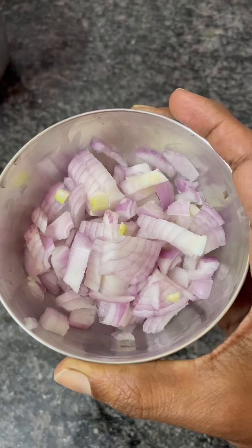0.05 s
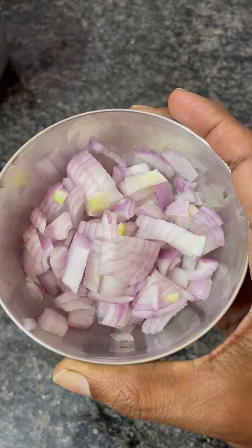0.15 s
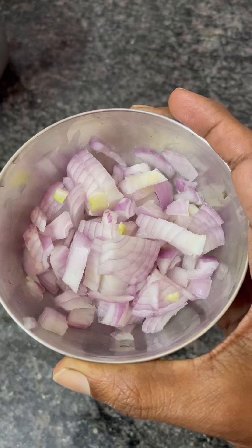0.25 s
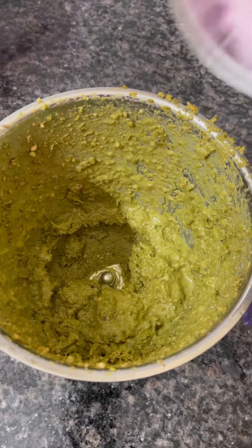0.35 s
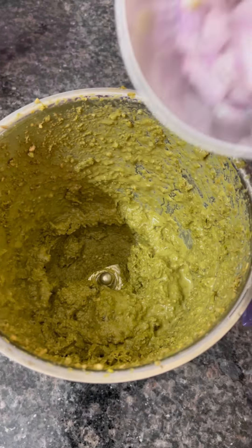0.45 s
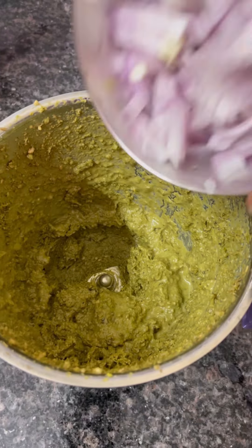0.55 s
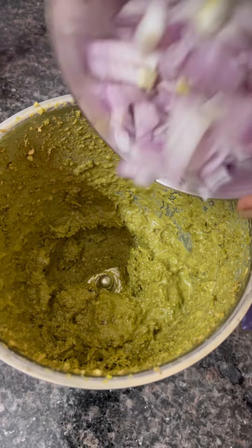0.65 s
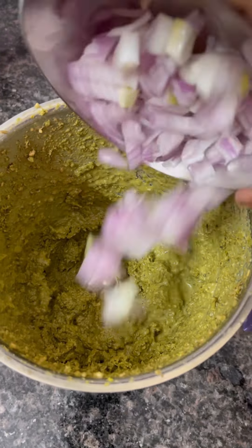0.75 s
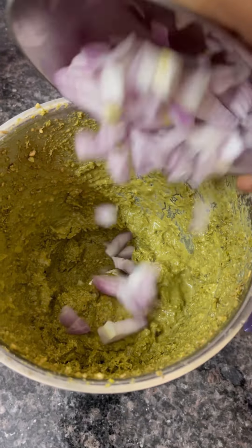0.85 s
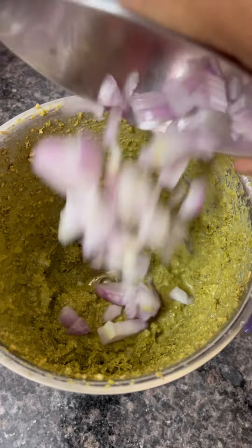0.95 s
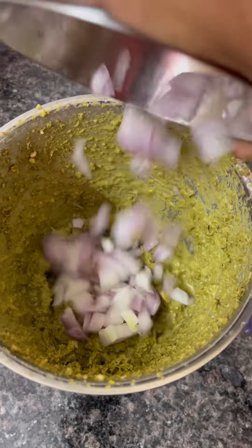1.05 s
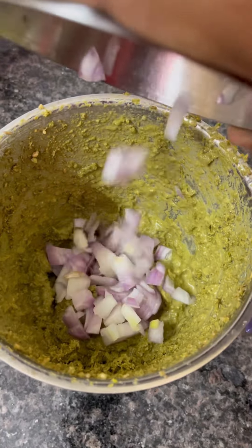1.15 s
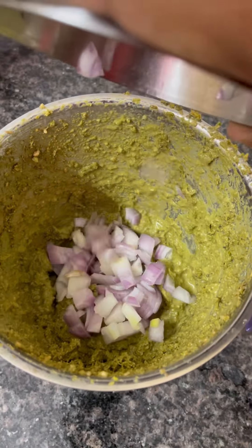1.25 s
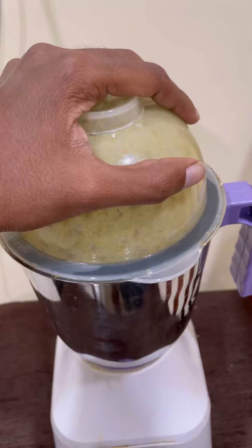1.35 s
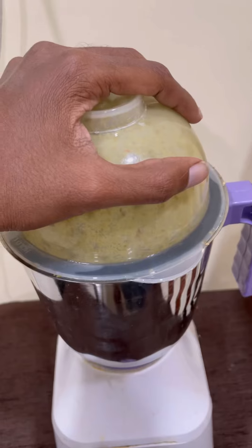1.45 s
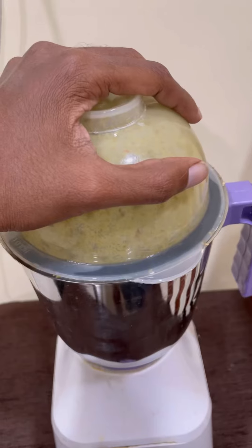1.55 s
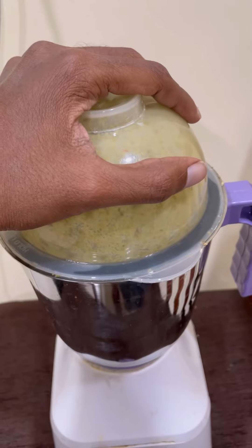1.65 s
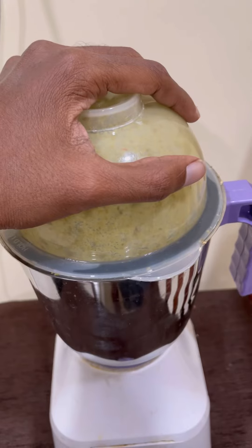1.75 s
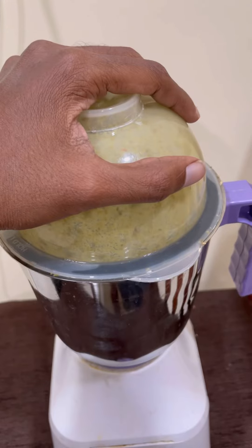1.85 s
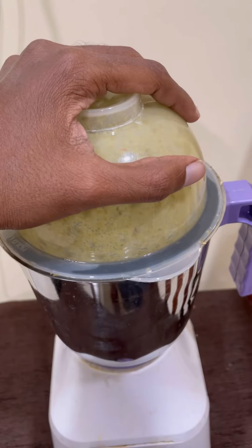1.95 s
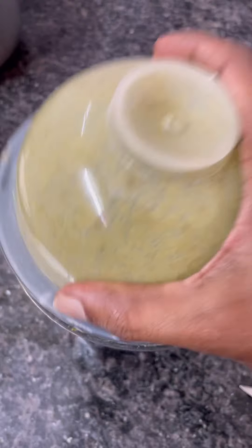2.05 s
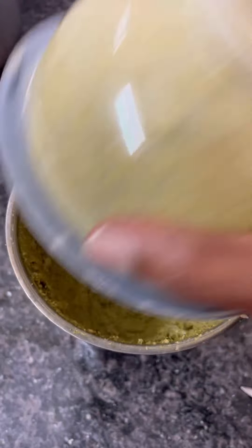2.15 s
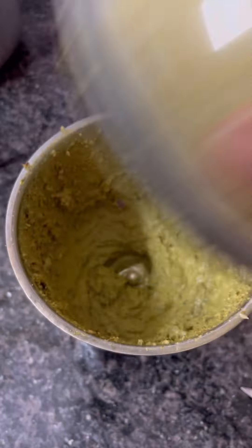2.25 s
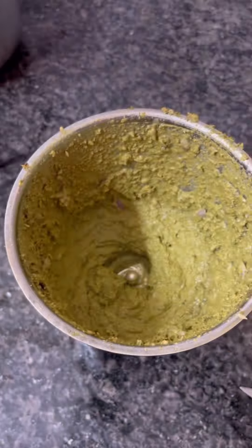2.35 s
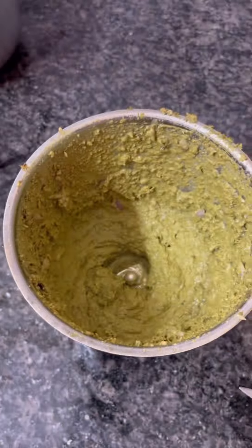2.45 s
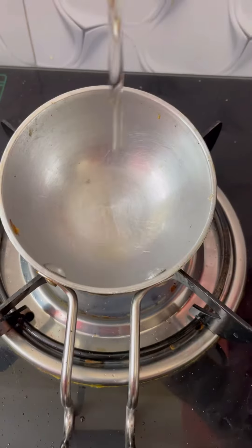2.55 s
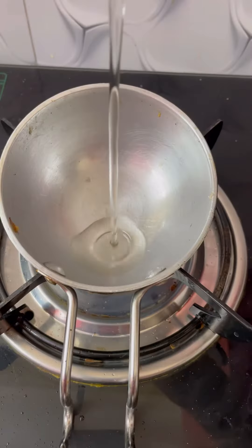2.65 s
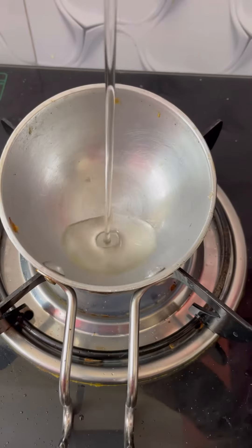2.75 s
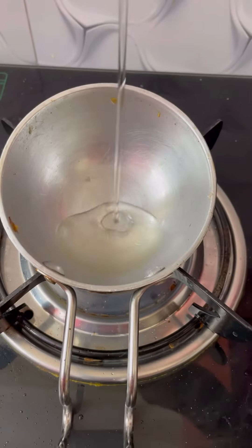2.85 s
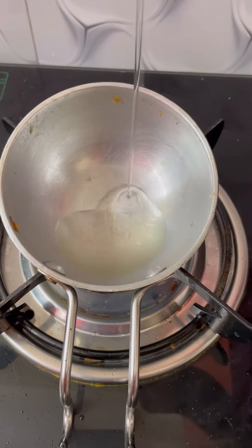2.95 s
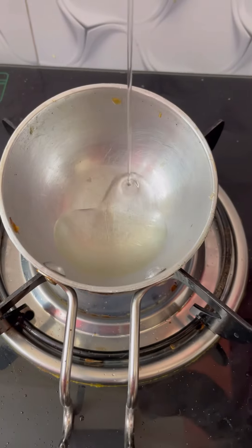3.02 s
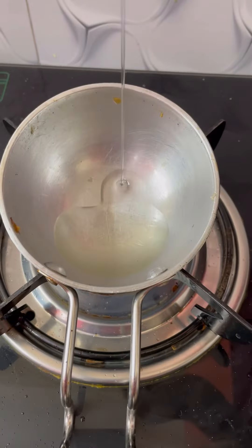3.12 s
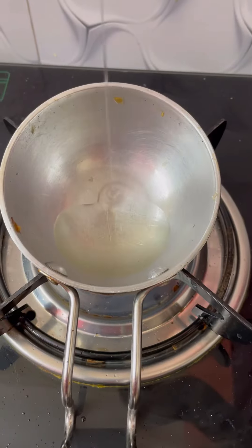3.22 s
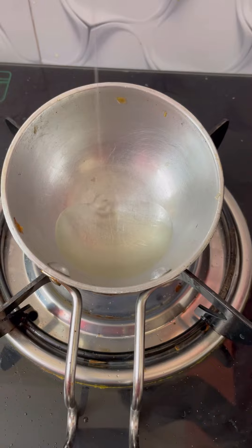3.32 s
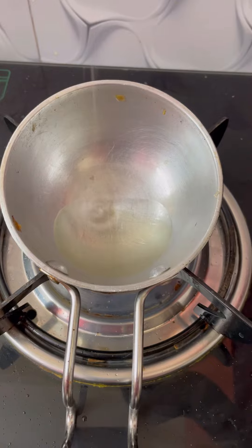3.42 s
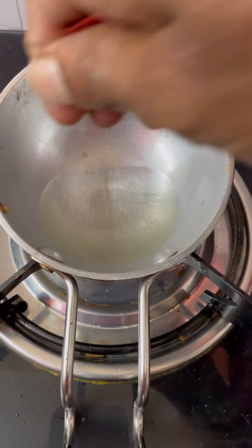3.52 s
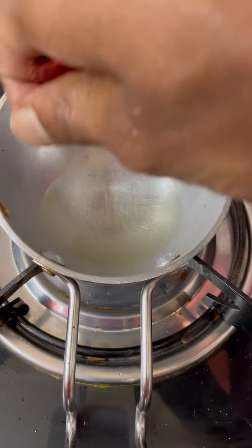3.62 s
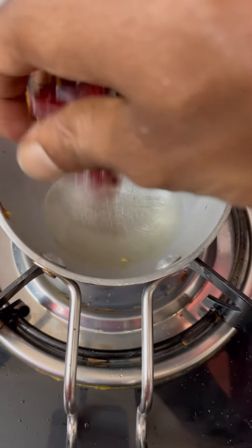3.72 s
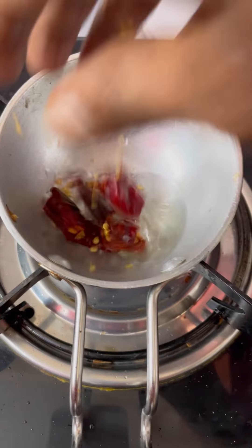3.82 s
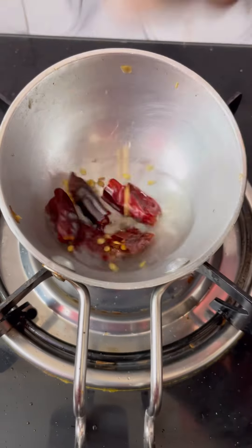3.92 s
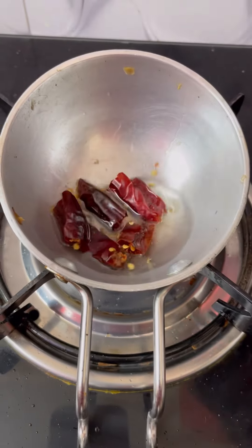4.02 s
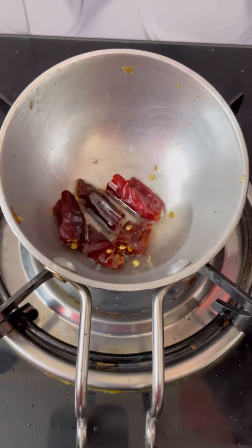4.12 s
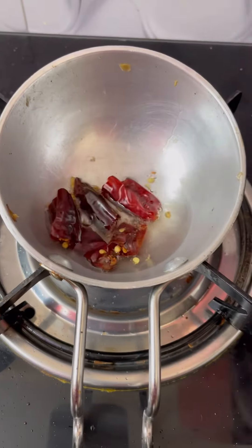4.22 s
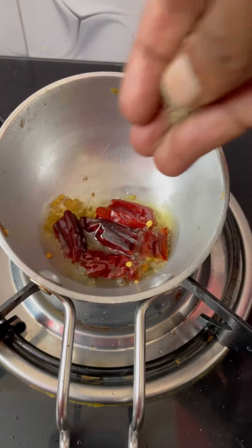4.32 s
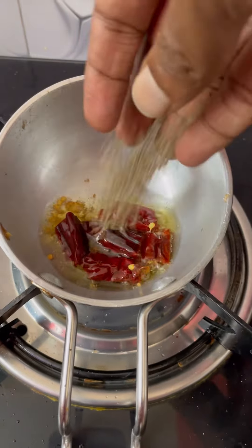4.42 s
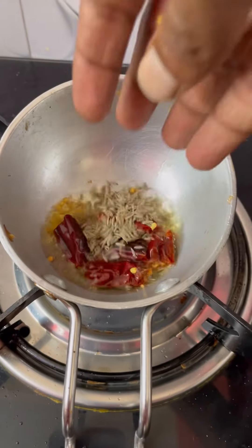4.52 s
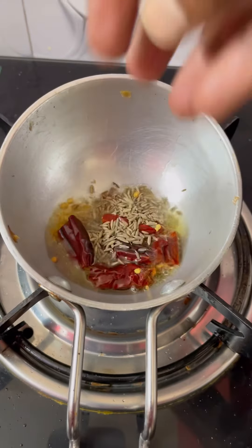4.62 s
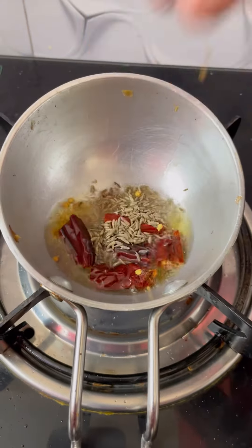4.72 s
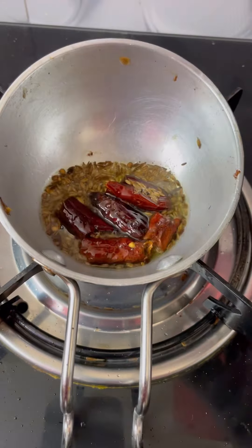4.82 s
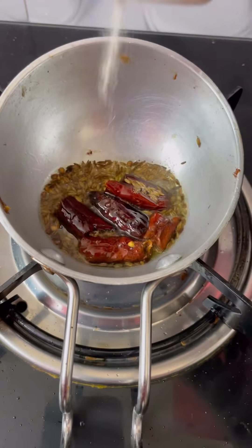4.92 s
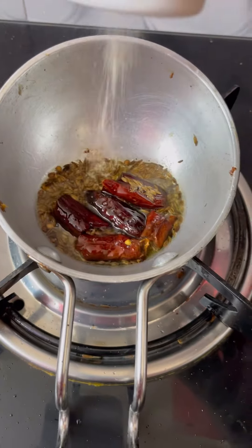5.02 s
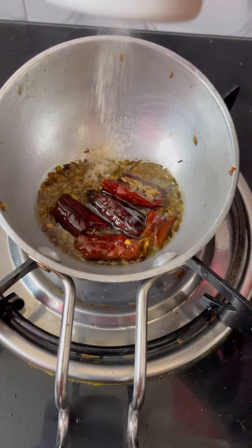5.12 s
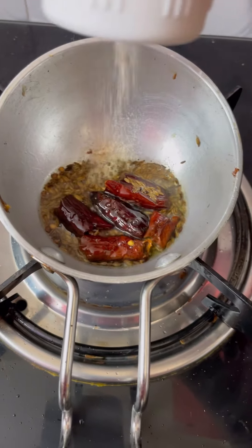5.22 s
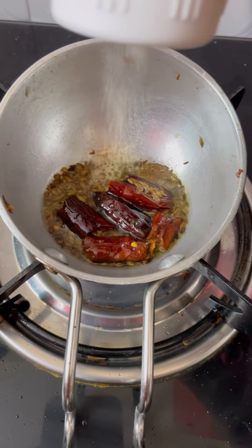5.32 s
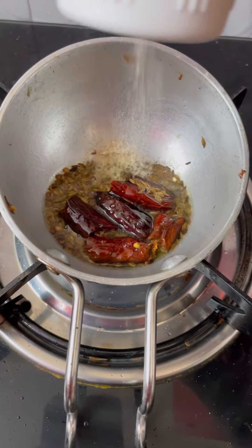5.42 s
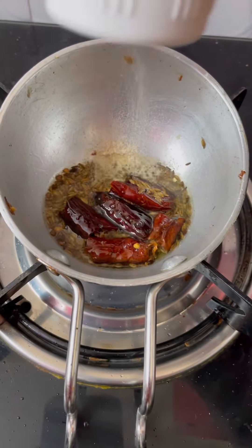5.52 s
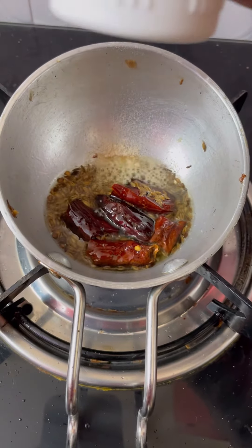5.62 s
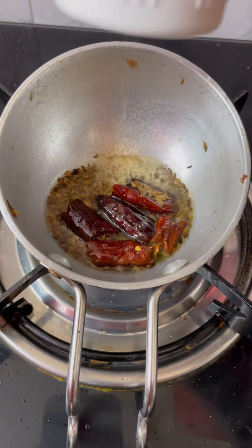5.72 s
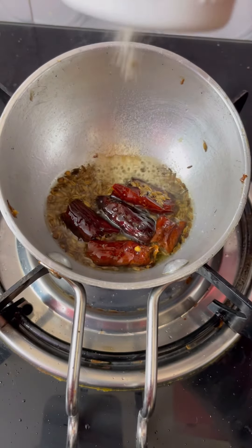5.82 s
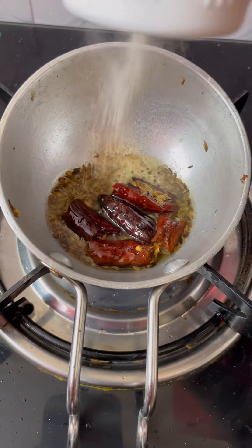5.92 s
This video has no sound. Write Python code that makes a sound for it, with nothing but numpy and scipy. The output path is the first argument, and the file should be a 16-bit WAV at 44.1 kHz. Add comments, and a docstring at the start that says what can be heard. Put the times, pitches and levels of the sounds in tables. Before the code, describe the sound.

Eight close kitchen passages are joined by hard cuts. From 0 to 0.3 s a low engine drone passes outside over dull rumble. At 0.3 the background drops; onion pieces tumble into a pasty steel jar from about 0.77 to 1.23, with crisp ticks, hollow knocks and short echoes. From 1.38 to 1.99 a mixer grinder roars, the loudest sound: a hum near 280 Hz sagging slightly, rough churning and a fluctuating whine near 3.3 kHz. Until 2.49 only low rumble and faint hiss remain. A gas flame then gusts unevenly, strongest near 2.83, with a thin high squeak flickering around 3.26-3.53. Chillies spit, ping and crackle at 3.75-4.0, then quieten. Seeds burst at 4.43, followed by hiss, sharp pops and a soft low air thump near 4.7. From 4.81 powder starts quietly, swelling by 5.3 into bright grainy sizzling with crowded pops until the 5.97 cut.

```python
"""A home kitchen, in eight short passages joined abruptly: an engine passes outside, chopped onion drops into
a steel jar, a mixer grinder runs, hands move on its lid, a gas flame roars under a pan, then chillies,
seeds and powder crackle in hot oil. Shaped noise makes each rumble and hiss, sine orders the machines,
damped modes the knocks, brief filtered clicks the pops and short rings the seeds.
A close pair of microphone ports hears the bass alike and the treble with a lag."""
import sys
import numpy as np
from scipy import signal
from scipy.fft import rfft, irfft, next_fast_len
from scipy.io import wavfile
from scipy.ndimage import uniform_filter1d, map_coordinates

SR = 44100
rng = np.random.default_rng(int(sys.argv[2]) if len(sys.argv) > 2 else 0)


def volts_from_decibels(level):
    """Turn decibel levels (scalar or array-like) into linear amplitude factors."""
    exponent = np.asarray(level, float) / 20
    return 10 ** exponent


def unload_audio(sound):
    """Save the sound as a 16-bit wav file, at the path given as the first command line argument."""
    columns = np.transpose(np.atleast_2d(sound))
    # keep every value between -1 and 1, then stretch to whole-number steps
    steps = np.round(np.clip(columns, -1, 1) * 32767)
    wavfile.write(sys.argv[1], SR, steps.astype(np.int16))


N = 263277

# Edges of the eight passages: time_s
CUTS = [0, .31, 1.3797, 1.9915, 2.493, 3.551, 4.3, 4.812, 5.97]
# Correlation of the two ports' noise: frequency_hz, likeness (0 to 1)
ALIKE = [(170, .998), (350, .9), (700, .5), (1400, .6), (2000, .93), (3400, .5), (4600, .9), (5200, .995),
         (6200, .9), (7200, .997), (10500, .997), (12000, .9), (13500, .995)]
# Echoes inside the pan: energy against the direct sound (dB), decay to -60 dB (s)
PAN_ECHO = -6, 0.022


def unit(x):
    """Normalization: scales a signal to rms 1."""
    return x / np.sqrt(np.mean(x ** 2) + 1e-20)


def along(points, hz):
    """Logarithmic frequency scale: reads (frequency_hz, value) points between their knots."""
    f, v = np.transpose(points)
    return np.interp(np.log(hz + 1), np.log(f + 1), v)


def clock(t0, t1):
    """Uniform sampling: the sample times between two moments."""
    return np.arange(round(t0 * SR), min(round(t1 * SR), N)) / SR


def curves(rows, t):
    """Linear interpolation: each column after the time, read at times t."""
    s, *columns = np.transpose(rows)
    return [np.interp(t, s, column) for column in columns]


def add(mix, x, s):
    """Superposition: lays x into the mix from time s."""
    part = mix[:, max(round(s * SR), 0):][:, :x.shape[-1]]
    part += x[..., :part.shape[1]]


def wobble(t, rate):
    """Slow modulation: a smooth random curve with rate knots a second."""
    return map_coordinates(rng.standard_normal(200), [(t - t[0]) * rate + 2], mode="wrap")


def filtered(x, response):
    """Linear filtering: multiplies the spectrum by a response of frequency."""
    m = next_fast_len(x.shape[-1] + 4096)
    spectrum = rfft(x, m) * response(np.fft.rfftfreq(m, 1 / SR))
    return irfft(spectrum, m)[..., :x.shape[-1]]


def scattered(t0, t1, levels_db, scatter_db, count):
    """Independent random events: uniform moments, each level normally scattered about its mean."""
    moments = t0 + (t1 - t0) * rng.uniform(size=(count, 1))
    levels = np.add(levels_db, scatter_db * rng.standard_normal((count, len(levels_db))))
    return list(np.hstack([moments, levels]))


def patchy(x, depth_db):
    """Time-frequency modulation: random gain in patches some 300 Hz wide and 40 ms long."""
    z = signal.stft(x, nperseg=512)[2]
    field = rng.standard_normal(z.shape[1:])
    field = uniform_filter1d(uniform_filter1d(field, size=4, axis=0), size=7, axis=1)
    return unit(signal.istft(z * volts_from_decibels(depth_db * unit(field)), nperseg=512)[1][:, :x.shape[1]])


def rush(t, gain, alike, lo_hz, hi_hz, grit, spiky_db):
    """Partly coherent turbulence: stereo noise, a share of it spiky grains, with rms 1 from lo to hi."""
    mid_noise, side_noise, grains = rng.standard_normal((3, len(t)))
    spikes = np.minimum(rng.exponential(size=len(t)), 6)  # the limit keeps grains smaller than pops
    grains = unit(grains * volts_from_decibels(spiky_db * spikes))
    mid_noise = np.sqrt(1 - grit) * mid_noise + np.sqrt(grit) * grains
    noise = patchy(np.array([mid_noise, side_noise]), depth_db=1.54)

    def mid_side_gain(hz):
        # the two powers add to one; their difference is the likeness
        angle = np.arccos(np.clip(along(alike, hz), -1, 1)) / 2
        return gain(hz) * [np.cos(angle), np.sin(angle)]

    mid, side = filtered(noise, mid_side_gain)
    hz = np.arange(lo_hz, hi_hz)
    band_rms = np.sqrt(np.sum(gain(hz) ** 2) * 2 / SR)
    return np.array([mid + side, mid - side]) / band_rms


def resonances(modes, hz):
    """Resonance: a vessel lifts the noise inside it around its modes."""
    return 1 + sum((volts_from_decibels(db) - 1) / (1 + (2 * (hz - c) / w) ** 2) for c, w, db in modes)


def backgrounds(mix):
    """Spectral shaping of broadband noise: the action swells each hiss, and the rumble follows in part."""
    # Colour of each passage's steady noise: frequency_hz, density_db (relative, per Hz)
    street, counter = [(20, -28), (35, -31), (55, -1.5), (110, -30), (160, -9), (240, -23.5), (400, -16.5),
                       (700, -17.5), (2000, -25.5), (3300, -29), (5000, -36), (7500, -38), (10500, -52),
                       (15500, -53)], [(20, -74), (35, -4), (55, -6), (110, -10.5), (160, -1), (240, -11.5),
                                       (400, -11.5), (700, -13), (2000, -24), (3300, -28.5), (5000, -35),
                                       (7500, -33.5), (10500, -43), (15500, -41)]
    churn, lid = [(20, -63), (55, -36), (110, -27.5), (160, -30), (240, -17.5), (400, -14.5), (800, -13),
                  (1000, -17), (1300, -17.5), (2000, -13.5), (2600, -17.5), (3000, -17), (4000, -17.5),
                  (5000, -20), (7500, -24.5), (10500, -30.5), (15500, -40.5)], [(20, -28.5), (35, -19), (55, -8.5), (110, -9), (160, -8.5), (240, -16.5),
                                 (400, -22.5), (700, -23.5), (2000, -26.5), (3300, -30.5), (5000, -38.5),
                                 (7500, -31), (10500, -43.5), (15500, -39)]
    burner, chilli = [(20, -37), (35, -30), (55, -27), (110, -11.5), (160, -2), (240, -0.5), (400, -5),
                      (700, -7), (2000, -10), (3300, -11.5), (5000, -12), (7500, -14.5), (10500, -17),
                      (15500, -26.5)], [(20, -27), (35, -15), (55, -3.5), (110, 1), (160, -9.5), (240, -7.5),
                                      (400, -11.5), (700, -14.5), (1300, -24.5), (2000, -22), (3300, -18),
                                      (5000, -20), (7500, -12.5), (10500, -23.5), (15500, -22)]
    cumin, powder = [(20, -20), (35, -28), (55, 1), (110, 2.5), (160, -4), (240, 0), (400, -5.5),
                     (700, -6.5), (2000, -1), (3300, -2.5), (5000, -7), (7500, -3.5), (10500, -8),
                     (15500, -8)], [(20, -27), (35, -26), (55, -5.5), (110, -3), (160, -10), (240, -17),
                                    (400, -19.5), (700, -20.5), (2000, -12), (3300, -13.5), (5000, -11),
                                    (7500, -2.5), (10500, -8.5), (15500, 1.5)]
    # Steady levels: rumble_db (rms, 40-400 Hz), hiss_db (rms, 910-6730 Hz), followed share of the swell
    steady = [(-43.5, -53.5, 0), (-53.5, -63.5, 0.7), (-29.5, -26, 0), (-49.5, -63, 0), (-51.5, -52, 0.48),
              (-57, -60, 0.57), (-65, -52, 0.7), (-52.5, -53, 0.15)]
    # Share of the hiss made of grains, by passage: share (0 to 1)
    grain_share = [0.055, 0.47, 0.16, 0.13, 0.31, 0.91, 0.7, 0.89]
    # Fast wavering of the hiss, by passage: depth_db
    flicker = [1.2, 1.5, 0.6, 1.4, 1.3, 1.45, 1.2, 1.87]
    # Onion slides and settles: time_s, swell_db over the steady hiss
    tumble = [(.31, -2.5), (.72, 2), (.8, 6), (.88, 3.5), (1.0, 8.5), (1.16, 5), (1.27, 1), (1.38, 0)]
    # Hands on the lid: time_s, swell_db
    lift = [(1.99, 1), (2.2, -1.5), (2.492, 3)]
    # The flame flares and sinks: time_s, swell_db
    flame = [(2.5, 4.5), (2.57, -1), (2.678, 7), (2.735, -1), (2.828, 15), (2.978, -5.5), (3.025, 3.5),
             (3.066, -6.5), (3.09, 0.5), (3.155, -3), (3.224, 6.5), (3.266, 3), (3.312, 10.5), (3.42, -4.5),
             (3.5, 3.5), (3.55, 3)]
    # How hard the oil fries, one table for each of the last three passages: time_s, swell_db
    frying = [
        [(3.55, 1), (3.72, -0.5), (3.83, 5), (4.1, -2), (4.3, 3)],
        [(4.3, -1), (4.52, 0.5), (4.66, 4.5), (4.81, 1.5)],
        [(4.81, -14.5), (4.95, -7.5), (5.07, -2), (5.3, 2.5), (5.55, 2), (5.75, 3), (5.97, 1.5)],
    ]
    # Modes of the running jar: frequency_hz, width_hz, lift_db over the churn
    jar_modes = [(377, 12, 11), (455, 12, 11), (722, 25, 6), (1205, 30, 6), (1480, 30, 5), (1630, 50, 7),
                 (1857, 30, 7), (2200, 50, 8), (2360, 40, 5), (2778, 40, 9), (3830, 40, 5), (4400, 45, 4),
                 (4980, 45, 4)]
    # Modes of the pan's bowl: frequency_hz, width_hz, lift_db; the first is for the nearly empty pan
    bowl_modes = [(1296, 140, 6.5), (1900, 370, 4), (5110, 300, 9.5)]
    # Likeness of the ports while the flame roars: frequency_hz, likeness (0 to 1)
    flame_alike = [(300, 1), (700, 0.92), (1400, 0.13), (5000, 0.1), (8000, 0.038), (11000, 0.66),
                   (16000, 1)]

    still = [(0, 0)]
    swells = [still, tumble, still, lift, flame] + frying
    colours = [street, counter, churn, lid, burner, chilli, cumin, powder]
    empty_pan, oiled_pan = bowl_modes[:1], bowl_modes[1:]
    vessels = [[], [], jar_modes, [], empty_pan, oiled_pan, oiled_pan, oiled_pan]

    def below(hz):
        # rumble below about 600 Hz, hiss above
        return 1 / np.sqrt(1 + (hz / 600) ** 4)

    for k, ((low_db, high_db, follow), colour) in enumerate(zip(steady, colours)):
        t = clock(CUTS[k], CUTS[k + 1])
        swell_db, = curves(swells[k], t)
        alike = flame_alike if colour is burner else ALIKE
        body = lambda hz: volts_from_decibels(along(colour, hz)) * resonances(vessels[k], hz)
        low_gain = lambda hz: body(hz) * below(hz)
        high_gain = lambda hz: body(hz) * np.sqrt(1 - below(hz) ** 2)
        rumble = rush(t, low_gain, alike, 40, 400, grit=0, spiky_db=0)
        hiss = rush(t, high_gain, alike, 910, 6730, grain_share[k], spiky_db=3.5)
        rumble_db = low_db + follow * swell_db + 0.87 * wobble(t, 10.9)
        hiss_db = high_db + swell_db + flicker[k] * wobble(t, 44.66)
        add(mix, volts_from_decibels(rumble_db) * rumble + volts_from_decibels(hiss_db) * hiss, CUTS[k])


def stack(rows, orders, t, rough_db):
    """Harmonic series: multiples of a turning rate, each with its own unsteady level."""
    hz, db = curves(rows, t)
    turns = 2 * np.pi * np.cumsum(hz) / SR
    total = np.zeros(len(t))
    for k, level_db in orders:
        order_db = level_db + rough_db * np.sqrt(k) * wobble(t, 24.0)
        total += np.sqrt(2) * volts_from_decibels(order_db) * np.sin(k * turns + rng.uniform(0, 2 * np.pi))
    return volts_from_decibels(db) * total


def passing_engine(mix):
    """Periodic firing: an engine sounds at its firing rate and whole multiples of it."""
    # Firing: time_s, rate_hz, level_db
    firing = [(0.0, 50.65, -44.5), (0.114, 53.5, -41.5), (0.31, 55.1, -43)]
    # Firing orders: multiple, level_db against the firing level
    firing_orders = [(1, -1), (2, -3.5), (3, -9.5), (4, -9), (5, -15), (6, -13.5)]
    add(mix, stack(firing, firing_orders, clock(CUTS[0], CUTS[1]), rough_db=1.0), CUTS[0])


def hums(mix):
    """Narrow-band noise: a sharp resonance curve leaves a faint wavering tone, alike at both ports."""
    # Tones: start_s, end_s, frequency_hz, width_hz, level_db (rms)
    tones = [(0.308, 1.374, 107.5, 7.1, -55.5), (0.303, 1.374, 4060, 34, -78),
             (1.993, 2.487, 176.8, 4, -50.5), (4.297, 4.552, 250.4, 15, -61.5),
             (4.816, 5.582, 103.5, 13, -49), (4.81, 5.403, 201, 12, -62), (5.552, 5.968, 71.8, 6.5, -49)]
    for t0, t1, c, w, db in tones:
        narrow = lambda hz: 1 / (1 + (2 * (hz - c) / w) ** 2)
        noise = rng.standard_normal(len(clock(t0, t1)))
        add(mix, volts_from_decibels(db) * unit(filtered(noise, narrow)), t0)


def echoed(x, wet_db, t60):
    """Reverberation: nearby metal and tiles answer with a decaying tail, different at each port."""
    t = np.arange(1500) / SR
    tail = rng.standard_normal((2, len(t))) * volts_from_decibels(-60 * t / t60) * (t > .0008)
    tail *= volts_from_decibels(wet_db) / np.linalg.norm(tail[0])
    tail[:, 0] = 1  # the direct sound
    return signal.fftconvolve(x[None], tail, axes=1)


def onion(mix):
    """Impact excitation: each piece ticks on the steel and knocks the jar's damped modes."""
    # The larger pieces: start_s, tick_db, knock_db (before echoes), tick_hz
    pieces = [(0.7743, -37.5, -56, 6000), (0.7982, -45, -51, 4000), (0.8096, -29.5, -22.5, 1520),
              (0.8254, -33, -34, 2500), (0.869, -47, -36.5, 5200), (0.9486, -44, -35, 1500),
              (0.99, -31, -33.5, 2500), (1.0152, -34.5, -54, 5500), (1.0349, -25.5, -57, 2450),
              (1.0639, -30, -37, 1190), (1.0745, -39, -62, 5000), (1.1664, -38.5, -55, 6000),
              (1.2255, -36, -48, 1100)]
    # Modes of the jar with paste, before a small scatter: frequency_hz, level_db, t60_s
    steel_modes = [(180, -9, .12), (339, -9, .08), (480, -12, .05), (619, 0, .09), (700, -8, .07),
                   (900, -11, .04), (1300, -12, .03), (1980, -16, .025)]
    t = np.arange(SR // 6) / SR
    # small pieces patter down between 0.82 and 1.12 s: mean tick_db, knock_db
    patter = scattered(0.82, 1.12, (-47, -47.5), scatter_db=4.5, count=12)
    small = [(*row, 3500 * np.exp(0.36 * rng.normal())) for row in patter]
    for s, tick_db, knock_db, tick_hz in pieces + small:
        ring = np.zeros(len(t))
        for hz, db, t60 in steel_modes:
            decay = volts_from_decibels(db + 2 * rng.normal() - 60 * t / t60)
            ring += decay * np.sin(2 * np.pi * hz * (1 + .02 * rng.normal()) * t)
        knock = volts_from_decibels(knock_db) * ring * (1 - np.exp(-t / 0.0022))

        def tick_band(hz):
            low_cut = 1j * hz / (0.26 * tick_hz + 1j * hz)
            return (low_cut / (1 + 1j * hz / (2.84 * tick_hz))) ** 2

        tick = filtered(rng.standard_normal(len(t)) * volts_from_decibels(-60 * t / 0.015), tick_band)
        tick = volts_from_decibels(tick_db) * tick / abs(tick[:90]).max()
        add(mix, echoed(knock + tick, wet_db=-6, t60=0.092), s)


def grinder(mix):
    """Rotation orders: the shaft's multiples, and the commutator's rough whine near 12 times its rate."""
    # The motor slows under load: time_s, turns_per_s, level_db
    shaft = [(1.38, 280.5, -19), (1.62, 277.8, -22.5), (1.99, 277.8, -22)]
    # Shaft orders: multiple, level_db against the shaft level
    shaft_orders = [(1, -0.5), (2, -16.5), (3, -27), (10, -55)]
    # Commutator whine: time_s, level_db (rms, 3200-3410 Hz)
    whine_levels = [(1.39, -31), (1.56, -31), (1.606, -24.5), (1.76, -38), (1.788, -19), (1.845, -35),
                    (1.89, -26.5), (1.985, -33)]
    t = clock(CUTS[2], CUTS[3])
    add(mix, stack(shaft, shaft_orders, t, rough_db=1.5), CUTS[2])

    def whine_gain(hz):
        offset = hz - 3320
        return 1 / (1 + (offset / 40) ** 2) + 0.34 / (1 + (offset / 170) ** 2)

    whine = rush(t, whine_gain, ALIKE, 3200, 3410, grit=0, spiky_db=0)
    add(mix, volts_from_decibels(curves(whine_levels, t)[0]) * whine, CUTS[2])


def squeak(mix):
    """Gaussian tone bursts: a thin high squeak flickers over the flame."""
    # Its loud flickers (each peaks 2.8 ms after its time): time_s, peak_db
    chirps = [(3.259, -41), (3.2805, -32), (3.3348, -42), (3.362, -45), (3.4895, -41.5), (3.5349, -46)]
    t = np.arange(-300, 300) / SR
    start_s, end_s, flickers_per_s = 3.33, 3.49, 85
    flutter = []
    for s in np.arange(start_s, end_s, 1 / flickers_per_s):
        fading_db = -49.5 - 52 * (s - start_s)
        flutter.append((s + 0.0023 * rng.normal(), fading_db + 3 * rng.normal()))
    for s, db in chirps + flutter:
        hz = 10550 + 50 * rng.normal()
        add(mix, volts_from_decibels(db) * np.exp(-(t / 0.002) ** 2) * np.sin(2 * np.pi * hz * t), s - .004)


def pops(mix):
    """Impulsive release: a steam pocket bursts with a brief crack, a low push and echoes in the pan."""
    # The loud pops, whose crack comes 1.7 ms after the time: time_s, level_db,
    # then against that level body_db (near 2.5 kHz), edge_db (near 12 kHz, before 1 dB more),
    # push_db (before 0.5 dB more)
    loud = [(3.7902, -23, -17, -5, -13), (3.8266, -23, -12, -4, -30), (3.8747, -23, -15, -7, -37),
            (3.9442, -37, -1, -8, -26), (4.2056, -33.5, -7, -26, -7), (4.5542, -34.5, -1, -24, -12),
            (4.6118, -19.5, -3.5, -0.5, -8), (4.669, -40, -11, 6, -19), (4.6877, -26, 6, -29, -25),
            (4.7311, -19.5, -9, -32, -23), (4.7363, -26, 6, -38, -21), (5.229, -26, -13, 10, -30),
            (5.2374, -36.5, -17, 14, -17), (5.3018, -35.5, -19, 15, -12), (5.4332, -24.5, 6.5, -3, 3),
            (5.546, -30, -18, -1, -31), (5.6046, -28.5, -17, 4, -17), (5.72, -38, -12, 12, -20),
            (5.7349, -29, 12, 0, -33), (5.7799, -29, -12, -11, -32), (5.8631, -32, -17, 12, -29),
            (5.879, -18.5, -12, -13, -34), (5.896, -32, -20, 0, -30), (5.9155, -29, -15, -5, -27)]
    t = np.arange(-100, 500) / SR
    small = np.array([-45, -16, 8.5, -22])  # mean level_db, body_db, edge_db, push_db
    crowd = scattered(5.08, 5.95, small, 3, count=45)  # they crowd once the powder fries
    sparse = scattered(CUTS[5], CUTS[7], small - 6, 3, count=10)
    for s, db, body_db, edge_db, push_db in loud + crowd + sparse:
        pan_db = 1.5 * rng.normal()  # left over right
        colour = [(700, body_db - 8), (2500, body_db), (5500, 0), (12000, edge_db + 1)]
        debris = .25 * rng.standard_normal(len(t)) * volts_from_decibels(-60 * abs(t) / .002) * (t > 0)
        crack = filtered((t == 0) + debris, lambda hz: volts_from_decibels(along(colour, hz)))
        push = volts_from_decibels(push_db + 0.5 - 60 * t / 0.0023) * np.sin(2 * np.pi * 650 * t) * (t > 0)
        pop = echoed(volts_from_decibels(db) * (5.6 * crack + push), *PAN_ECHO)
        add(mix, pop * volts_from_decibels([[pan_db / 2], [-pan_db / 2]]), s + 0.0017 + t[0])


def droplets(length, count):
    """Damped oscillation: short rings at scattered pitches, sizes and moments."""
    when = rng.uniform(size=(count, 1))
    hz = 4300 * np.exp(.4 * rng.standard_normal((count, 1)))
    size = np.minimum(rng.exponential(size=(count, 1)), 3)
    n = np.arange(300)
    cycles = n / SR * hz
    rings = volts_from_decibels(-4.5 + 3.1 * size - 60 * cycles / 38) * np.sin(2 * np.pi * cycles)  # -60 dB in 38 cycles
    places = (when * length).astype(int) + n
    return np.bincount(places.ravel(), rings.ravel(), length + len(n))[:length]


def spitting(mix):
    """Dense random impulses: spices meet the oil in a sudden crackle that holds and dies away."""
    # Spices land and spit: start_s, hold_s, level_db, t60_s
    bursts = [(3.752, 0.0087, -41, 0.034), (3.786, 0.017, -37, 0.06), (3.811, 0.023, -37, 0.22),
              (4.426, 0.034, -33.5, 0.24), (4.68, 0.23, -60.5, .02)]
    # Colour of the crackle: frequency_hz, density_db (relative, per Hz)
    spit_colour = [(500, -18), (1500, -8.5), (3000, -1), (5500, 1.5), (9000, -0.5), (13000, -14.5),
                   (16000, -2)]
    gain = lambda hz: volts_from_decibels(along(spit_colour, hz))
    for s, hold, db, t60 in bursts:
        t = clock(s, s + 0.5)
        fall_db = -60 * np.maximum(t - s - hold, 0) / t60
        spit = rush(t, gain, ALIKE, 1500, 16700, grit=0.84, spiky_db=4.0)
        spit = spit + droplets(len(t), count=200)
        rise = 1 - np.exp(-(t - s) / 0.0029)
        add(mix, volts_from_decibels(db + fall_db + 1.5 * wobble(t, 150)) * spit * rise, s)


def pings(mix):
    """Modal ringing: a hard seed strikes the pan and rings at one pitch with a rough neighbour."""
    # Strikes: start_s, level_db (before the rise and echoes), pitch_hz
    strikes = [(3.7985, -30, 5000), (3.8155, -31, 1900), (3.8275, -25, 5150), (3.8415, -26, 3080),
               (3.8755, -27, 5420), (4.3685, -23.5, 4830), (4.4262, -25, 3330), (4.441, -26, 5470),
               (4.6873, -20, 4130)]
    t = np.arange(900) / SR
    for s, db, hz in strikes:
        neighbour_hz = hz * (1.12 + 0.039 * rng.normal())
        ring = np.sin(2 * np.pi * hz * t) + .5 * np.sin(2 * np.pi * neighbour_hz * t)
        envelope = volts_from_decibels(db - 60 * t / .01) * (1 - np.exp(-t / .0004))
        add(mix, echoed(envelope * ring, *PAN_ECHO), s)


def air_puff(mix):
    """Low-frequency turbulence: a puff of air thumps the ports."""
    # Strength of the puff: time_s, level_db (rms, 40-500 Hz)
    buffet = [(4.68, -43), (4.69, -32.5), (4.728, -28), (4.792, -33), (4.812, -39)]
    # Colour of the puff: frequency_hz, density_db (relative, per Hz)
    puff_colour = [(25, -27), (60, -4), (100, 8.5), (160, -9), (350, -8.5), (600, -26.5), (1500, -46)]
    t = clock(4.684, CUTS[7])
    puff = rush(t, lambda hz: volts_from_decibels(along(puff_colour, hz)), ALIKE, 40, 500, grit=0, spiky_db=0)
    add(mix, volts_from_decibels(curves(buffet, t)[0]) * puff, t[0])


def scene():
    """Superposition: the sum of all sources of the eight passages."""
    mix = np.zeros((2, N))
    for source in (backgrounds, passing_engine, hums, onion, grinder, squeak, pops, spitting, pings, air_puff):
        source(mix)
    return mix


def roll_off(x):
    """The treble ends steeply here."""
    return signal.sosfilt(signal.butter(12, 17500, fs=SR, output="sos"), x)


def record(dry):
    """Phase difference: the ports part in the treble, thinning their sum near 8 and 14 kHz."""
    # Phase by which the left port leads: frequency_hz, lead_rad
    lead = [(0, 0), (2760, .4), (3450, 1.7), (4200, .6), (4900, 0), (5400, .1), (6200, 1.8), (7000, 3),
            (8500, 3.3), (9800, 5.9), (10500, 6.3), (12000, 7), (13300, 9.1), (14800, 9.5), (15500, 10.6),
            (16500, 11)]

    def response(hz):
        half_lead = .5 * np.interp(hz, *np.transpose(lead))
        band_limit = 1 / (1 + (hz / 15700) ** 60)
        return np.exp(1j * half_lead * [[1], [-1]]) * band_limit

    ports = filtered(dry, response)
    return roll_off(ports)


dry = scene()
out = record(dry)
unload_audio(out)
```